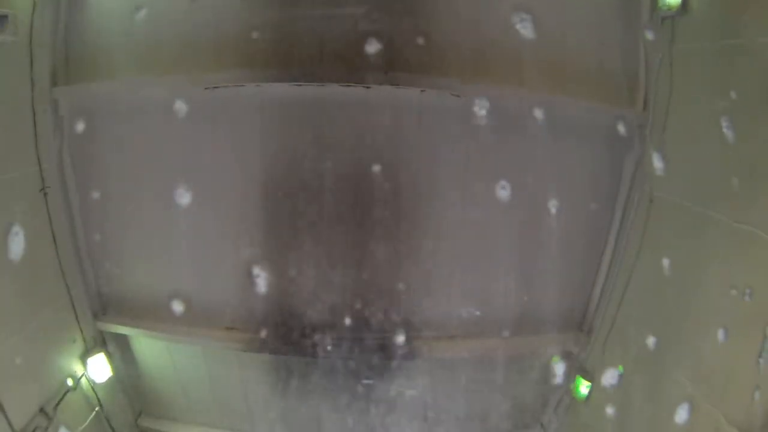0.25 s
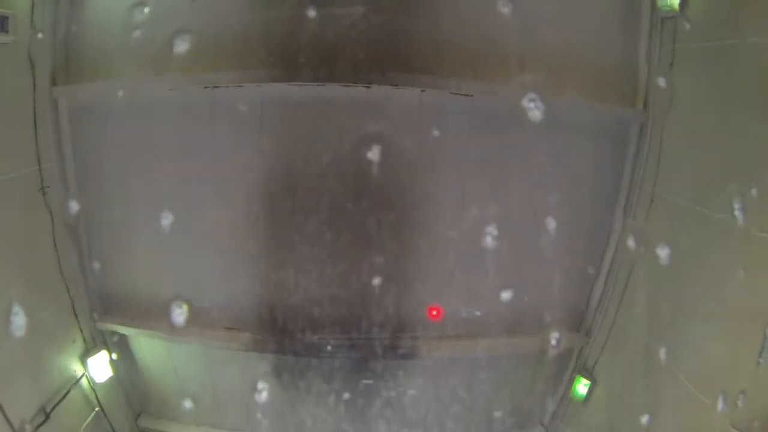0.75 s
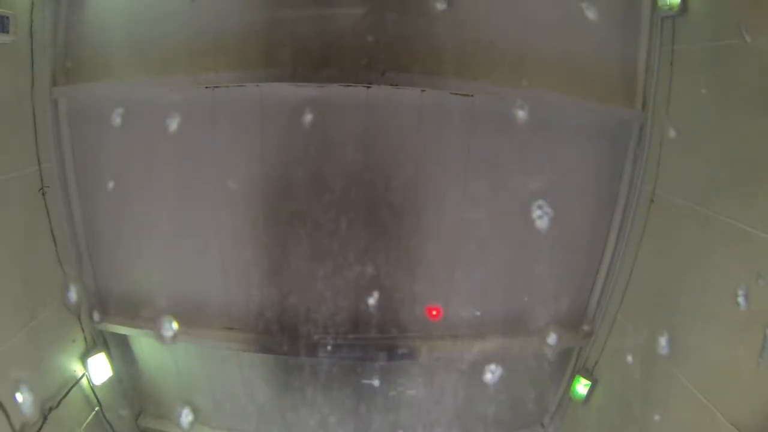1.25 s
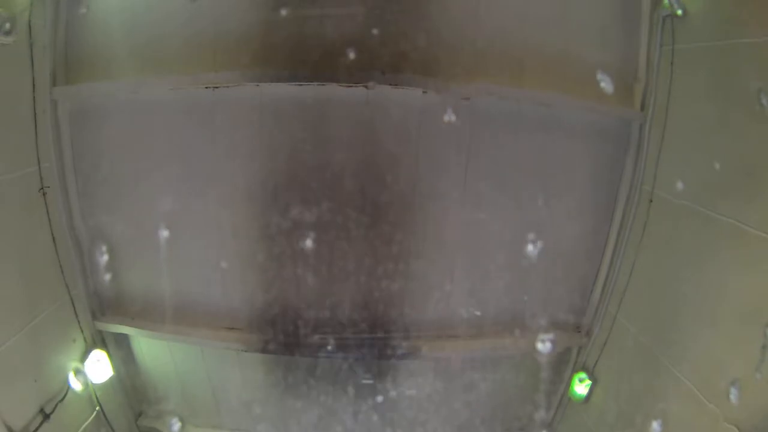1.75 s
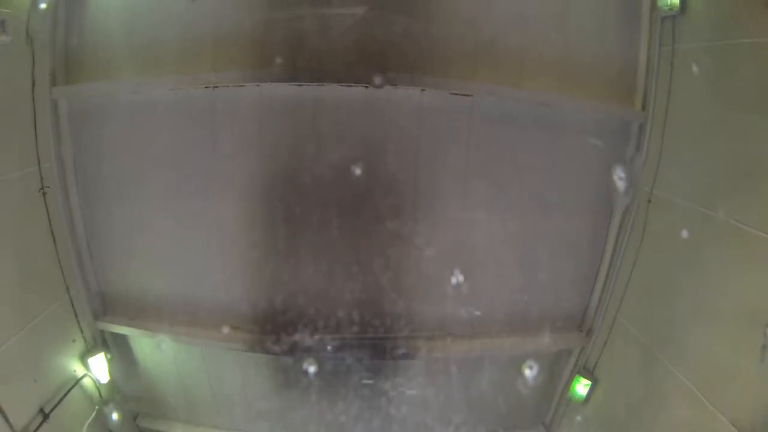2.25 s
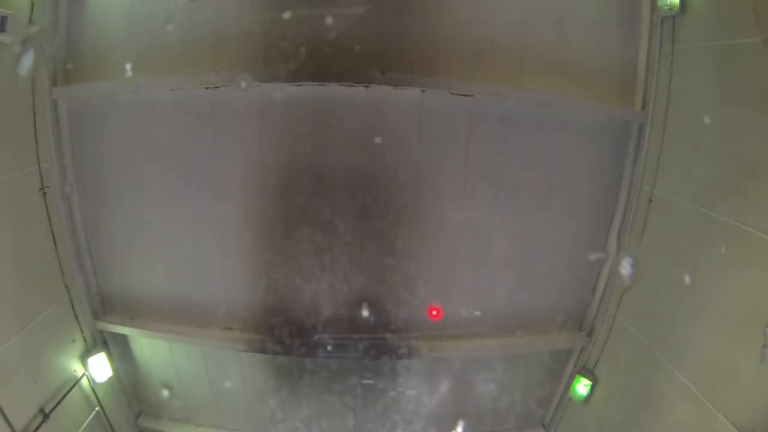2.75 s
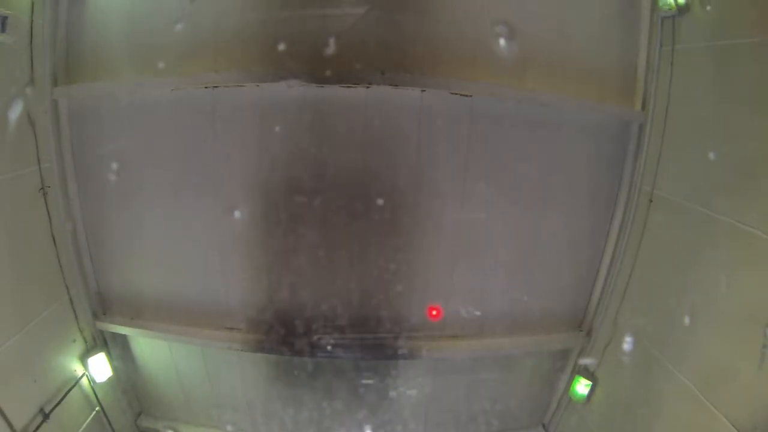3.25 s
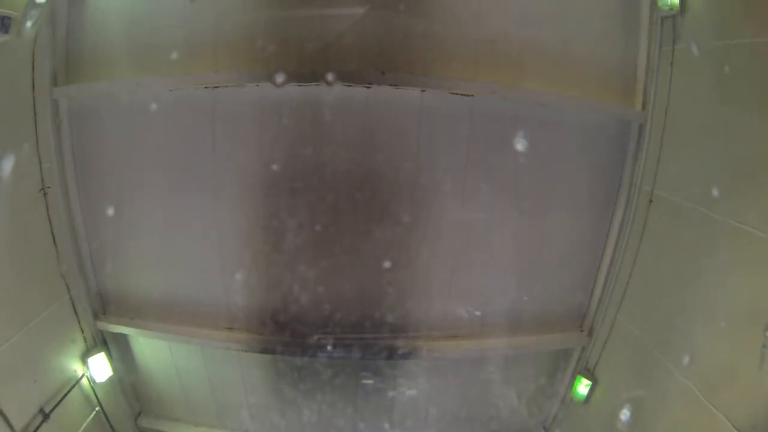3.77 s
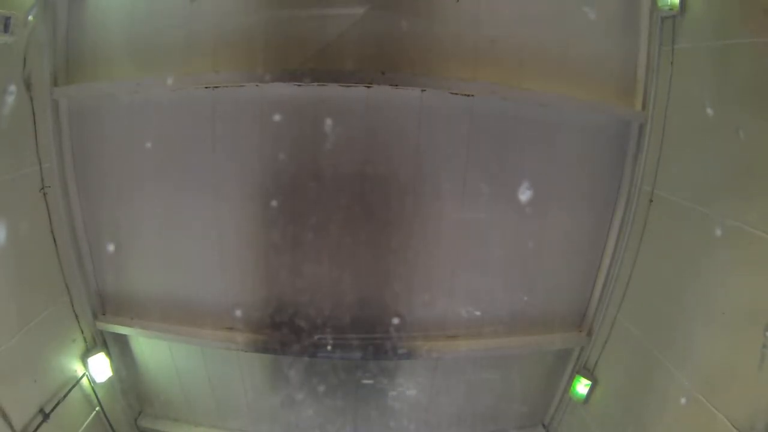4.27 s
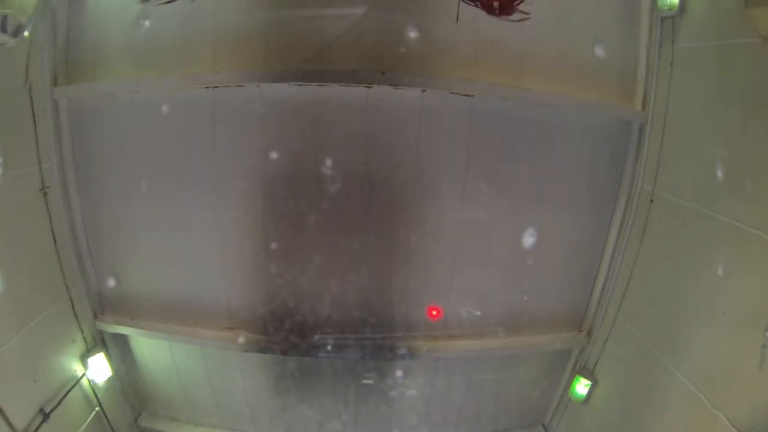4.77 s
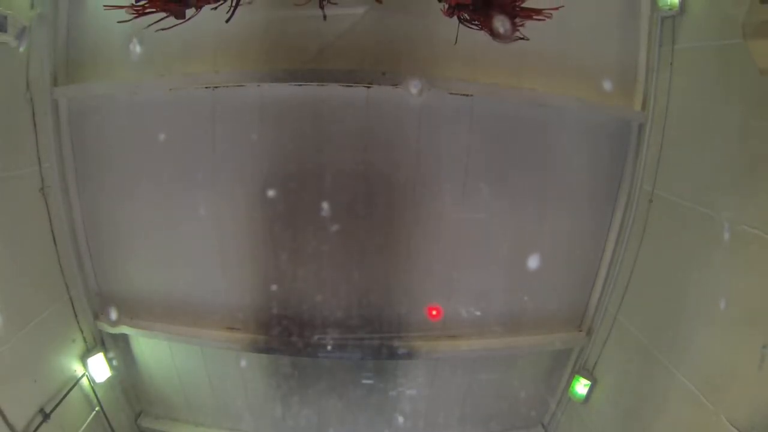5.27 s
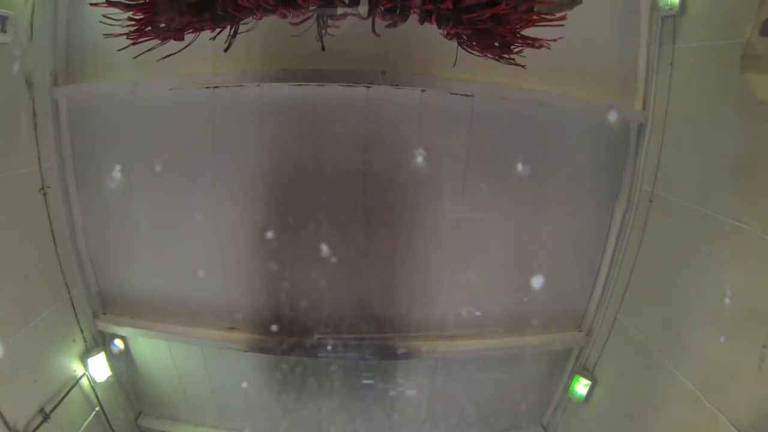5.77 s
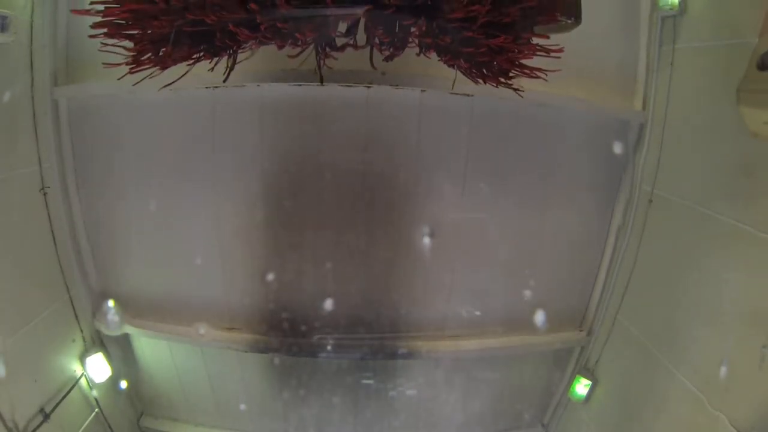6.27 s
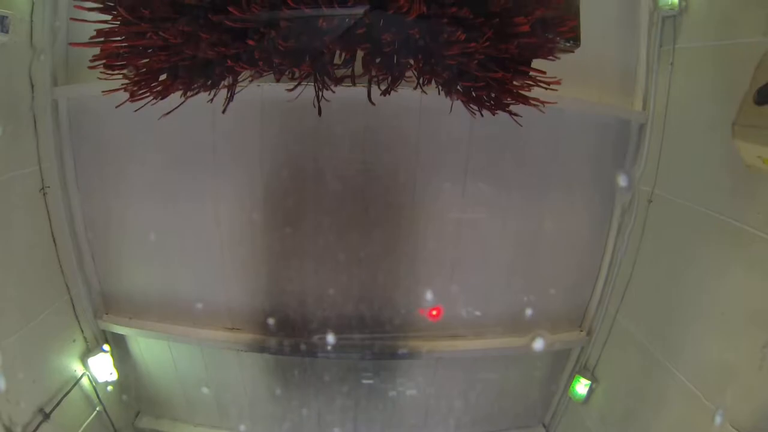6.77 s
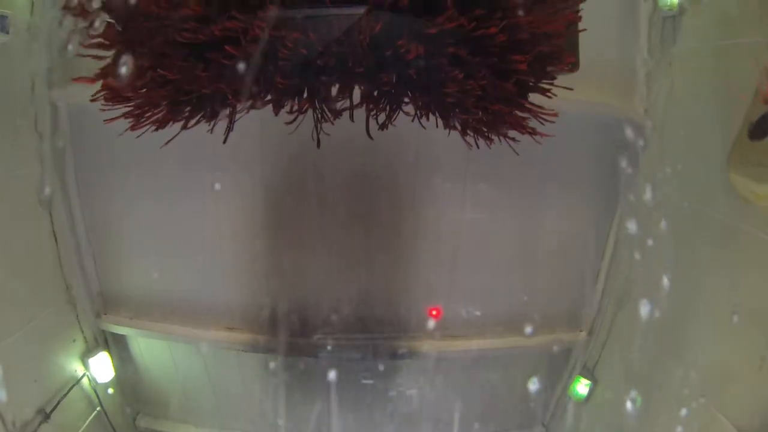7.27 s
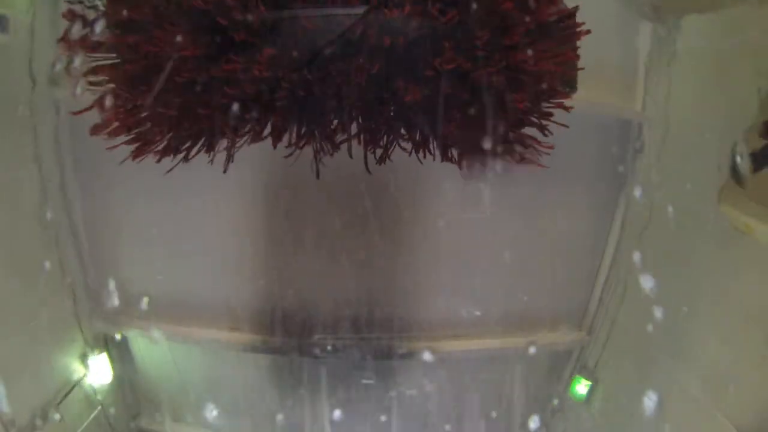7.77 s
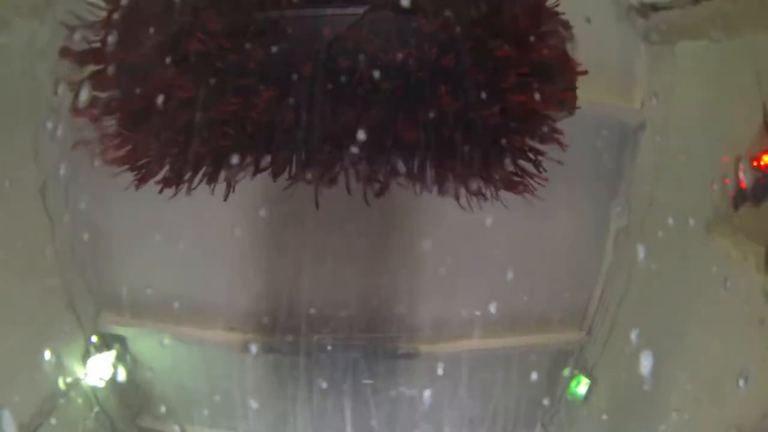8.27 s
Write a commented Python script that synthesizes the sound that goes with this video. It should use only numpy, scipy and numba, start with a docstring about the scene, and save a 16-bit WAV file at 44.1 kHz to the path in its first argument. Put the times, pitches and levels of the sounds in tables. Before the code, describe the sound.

Inside a closed car in a wash bay, muffled water rush and low motor hum run throughout. After faint early brushing, wet cloth strips begin slapping the shell in rhythmic bursts, with soft panel thuds, spray ticking on glass and deep cabin boom. The sweeps grow heavier and longer towards the end.

```python
"""Car wash from the cabin

Inside a closed car in an automatic wash: a spinning cloth brush comes closer and beats the shell in sweeps.
Close by, random slaps of wet strips ring the shell, fine spray ticks on the glass and wet cloth groans.
Soft thuds of the cloth's weight drum the panels; the shaken body makes the cabin air boom.
Beyond the glass, filtered noise gives wash and nozzle hiss, and wavering sines give the motors.
The recorder cuts the top of the treble."""
import sys
import numpy as np
from scipy import signal
from scipy.fft import rfft, irfft
from scipy.io import wavfile
from scipy.ndimage import uniform_filter1d
from numba import njit

SR = 44100
rng = np.random.default_rng(int(sys.argv[2]) if len(sys.argv) > 2 else 0)


def output_pcm(signal):
    """Save a mono or channel-first signal as 16-bit PCM at the path in sys.argv[1].

    Samples are clipped to [-1, 1] before scaling.
    """
    pcm = np.clip(np.atleast_2d(signal).T, -1, 1) * 32767
    wavfile.write(sys.argv[1], SR, np.round(pcm).astype(np.int16))


N = 375732
T = np.arange(N) / SR  # time in s


def undb(db):
    """Decibels to gain."""
    return 10 ** (np.asarray(db) / 20)


def to_db(gain):
    """Gain to decibels."""
    return 20 * np.log10(gain)


def unit(x):
    """Scale to standard deviation 1."""
    return x / np.std(x)


def smooth(x, k):
    """Running mean over k samples, twice."""
    return uniform_filter1d(uniform_filter1d(x, k), k)


def walk(rate):
    """Smooth random wandering of spread 1, with rate new values a second."""
    k = int(SR / rate)
    steps = np.repeat(rng.standard_normal(N // k + 1), k)
    return unit(smooth(steps, k)[:N])


def cut(x, hz, kind, order=2):
    """Low-pass or high-pass."""
    return signal.sosfilt(signal.butter(order, hz, kind, fs=SR, output="sos"), x)


def ring(x, modes):
    """Damped resonances side by side; neighbours swing in opposite sense."""
    out = 0
    for k, (hz, width_hz, db) in enumerate(modes):
        resonance = signal.lfilter(*signal.iirpeak(hz, hz / width_hz, SR), x)
        out = out + (-1) ** k * undb(db) * resonance
    return out


def colour(x, points, size=4096):
    """Causal minimum-phase filter with the given spectrum, made by folding its cepstrum."""
    hz, db = np.transpose(points)
    bins_hz = np.maximum(np.arange(size // 2 + 1) * SR / size, 1)
    spectrum_db = np.interp(np.log(bins_hz), np.log(hz), db)
    cepstrum = irfft(np.log(undb(spectrum_db)))
    cepstrum[1:size // 2] *= 2
    cepstrum[size // 2 + 1:] = 0
    response = irfft(np.exp(rfft(cepstrum)))
    return signal.fftconvolve(x, response)[:N]


@njit
def soften(x, hz):
    """Two-pole low-pass whose corner moves."""
    y, band, low = np.empty(len(x)), 0., 0.
    for i in range(len(x)):
        g = np.tan(np.pi * hz[i] / SR)
        v = (band + g * (x[i] - low)) / (1 + g * (g + 1.3))
        y[i] = low + g * v
        band, low = 2 * v - band, 2 * y[i] - low
    return y


def impacts(rate, spread_db):
    """Blows at random moments, rate a second, of either sign; spread_db makes their force uneven."""
    force = undb(spread_db * np.clip(rng.standard_normal(N), -2, 2))
    return (rng.random(N) < rate / SR) * force * rng.choice([-1, 1], N)


def play(x, db, span_s):
    """Bring a signal to the level db, keeping the unevenness that is faster than span_s."""
    power = smooth(x ** 2, int(span_s * SR))
    return undb(db) * x / np.sqrt(power + np.var(x) / 100)


def interior(x, t60, wet_db, count=6):
    """Short reflections inside the cabin: decaying noise tails whose mix wanders."""
    t = T[:SR // 5]
    tails = rng.standard_normal((count, len(t))) * np.exp(-np.log(1000) * t / t60)
    shares = np.array([walk(rate=14) for _ in tails])
    shares /= np.linalg.norm(shares, axis=0)
    wet = 0
    for share, tail in zip(shares, tails):
        wet = wet + share * signal.oaconvolve(x, tail / np.linalg.norm(tail))[:N]
    return x + undb(wet_db) * wet


def swell(s, half_width_s):
    """A smooth rise and fall about the moment s, 1 at its top."""
    return np.exp(-((T - s) / half_width_s) ** 2)


# running water and machinery all round the bay, relative spectrum: pitch_hz, level_db [dB per Hz]
BAY_SPECTRUM = [(30, 6), (100, -14), (175, 0.5), (270, -10.5), (500, -15), (1000, -21), (1550, -19.5),
                (2200, -27), (2900, -21.5), (4400, -31), (6500, -34), (9000, -39.5), (11200, -39),
                (14500, -43.5)]
# narrow hiss bands of the nozzles: pitch_hz, width_hz, level_db [relative]
NOZZLE_BANDS = [(5070, 190, -1), (10230, 260, -3)]
# motor hum and thin drive whine: pitch_hz, level_db [rms, about which it wavers]
MOTOR_TONES = [(59.2, -57.5), (119, -62), (179, -63.5), (818, -82), (1567, -80), (9830, -104), (10428, -96),
               (12646, -94)]


def machinery():
    """Outside the glass: broad wash of water and gear noise, hissing nozzles and wavering motor tones."""
    rumble_free = cut(rng.standard_normal(N), 25, "high")
    wash = unit(colour(rumble_free, BAY_SPECTRUM)) * undb(-57 + 0.63 * walk(rate=2.9))
    hiss = unit(ring(rng.standard_normal(N), NOZZLE_BANDS)) * undb(-79)
    hum = 0
    for hz, db in MOTOR_TONES:
        phase = 2 * np.pi * np.cumsum(hz + 2.455 * walk(rate=20)) / SR
        level = np.sqrt(2) * undb(db + 2 * walk(rate=10))
        hum = hum + level * np.sin(phase)
    return wash + hiss + hum


# slow shaking of the whole car: start_s, level_db [boom, before the trim in boom()]
SLOW_SHAKING = [(0, -46.5), (1.1, -53.5), (2.0, -45.5), (2.55, -41.5), (4.05, -41), (4.35, -38), (6.0, -36),
                (6.35, -41), (7.6, -35), (8.5, -36)]
# heavy shoves that rock the body: middle_s, level_db [boom, before the trim in boom()]
HEAVY_SHOVES = [(1.56, -43.5), (2.21, -40.5), (2.67, -34.5), (2.86, -37.5), (3.04, -32), (3.32, -39),
                (3.46, -33), (3.7, -32.5), (4.53, -35), (5.86, -33), (6.53, -34), (7.24, -34),
                (7.81, -30.5), (8.11, -27)]


def rocking():
    """Level of the boom in dB: slow shaking, joined by straight lines, and a few heavy shoves."""
    shaking_db = np.interp(T, *np.transpose(SLOW_SHAKING))
    shoves = sum(undb(db) * swell(s, half_width_s=0.085) for s, db in HEAVY_SHOVES)
    return to_db(np.hypot(undb(shaking_db), shoves))


# air of the cabin and the body on its springs: pitch_hz, width_hz, level_db [relative]
CABIN_MODES = [(28.4, 11, -7.5), (41.6, 8.4, -4), (55.75, 6.5, 3.5)]


def boom(shake_db):
    """The shaken body pumps the air of the closed cabin, which rings at its low resonances."""
    air = cut(ring(impacts(rate=390, spread_db=2.5), CABIN_MODES), 60.4, "low", order=4)
    return play(cut(air, 24.0, "high"), shake_db - .4, span_s=0.081)


# the brush turns steadily; its first tuft comes round at FIRST_TUFT_S and once a turn after that
FIRST_TUFT_S, TURN_S = 1.35, 0.79
# the four tufts of a turn: delay_s [after the first], half_width_s, strength_db
TURN_TUFTS = [(0, 0.047, -5), (0.144, 0.037, 1.5), (0.275, .027, -4.5), (.402, 0.037, -1)]


def tufts(lag_s=0):
    """Gain of the tufts as they come round, turn after turn."""
    turns = np.arange(FIRST_TUFT_S, T[-1], TURN_S) + lag_s
    return sum(undb(db) * swell(first + delay, width) for first in turns for delay, width, db in TURN_TUFTS)


def contact(start, end, rise, fall):
    """Gain of one sweep: attack, hold at 1, release; slopes in dB per s."""
    return undb(-rise * np.maximum(start - T, 0) - fall * np.maximum(T - end, 0))


PATTER_FALL, WEIGHT_FALL = 324, 74  # dB per s after a sweep
WEIGHT_RISE_SHARE = 0.63  # the weight builds more slowly than the patter
SLACK_DB, APPROACH_DB_PER_S = -9, 10  # weight left between sweeps; its fade-in before the first sweep
ARCH_DB = 1.5  # the weight swells by this much towards the middle of a sweep
TUFT_WEIGHT_DB, WEIGHT_LAG_S = 2.5, 0.03  # extra weight per unit of tuft gain, landing after the tips
STIR_DB = -15.5  # patter that the weight alone stirs up
FLING_DB, FLING_SLOPE = -50, 0.27  # below this patter level the spray dies away faster (extra dB per dB)
# sweeps of cloth over the car, long and short, on the whole growing heavier: start_s, end_s, rise_db_per_s,
# tufts_db, loose_strips_db, weight_db, spray_db [relative to the patter];
# levels before swells and the players' trims
CLOTH_SWEEPS = [(1.42, 1.69, 150, -83, -77, -58.5, -19), (1.78, 1.873, 196, -82, -84, -52.5, -18),
                (2.102, 2.31, 109, -80, -63.5, -49.5, -15), (2.44, 2.67, 352, -76.5, -68.5, -44, -23),
                (2.859, 3.123, 163, -45.5, -57.5, -43.5, -13), (3.172, 3.475, 449, -39, -61, -43, -12.5),
                (3.675, 4.02, 185, -38, -48.5, -41.5, -14), (4.068, 4.18, 400, -37.5, -49.5, -39, -12.5),
                (4.484, 4.953, 400, -39, -46.5, -43.5, -14), (5.302, 5.726, 451.5, -40, -43.5, -42.5, -14),
                (6.081, 6.176, 350, -43, -42.5, -44, -13), (6.2, 6.527, 201.5, -42, -39, -41, -13),
                (6.754, 6.845, 550, -43, -45.5, -44.5, -12), (6.886, 7.106, 121, -46, -39, -38.5, -11),
                (7.173, 7.439, 98, -42.5, -39, -38, -10.5), (7.6, 8.243, 143, -50.5, -39, -36.5, -11.5),
                (8.395, 8.6, 140, -38, -38, -35, -13)]


def turning():
    """Each sweep drags loose strips and tufts over the car; gives the levels of patter, spray and weight in dB."""
    tufted, patter = tufts(), 0
    starts, *_, weights_db, sprays_db = np.transpose(CLOTH_SWEEPS)
    approach_db = -APPROACH_DB_PER_S * np.maximum(starts[0] - T, 0)
    weight = undb(np.interp(T, starts, weights_db) + SLACK_DB + approach_db)
    for start, end, rise, tuft_db, loose_db, weight_db, _ in CLOTH_SWEEPS:
        slapping = np.hypot(undb(tuft_db) * tufted, undb(loose_db))
        patter = np.maximum(patter, contact(start, end, rise, PATTER_FALL) * slapping)
        arch = np.sin(np.pi * np.clip((T - start) / (end - start), 0, 1))
        pressing = contact(start, end, rise * WEIGHT_RISE_SHARE, WEIGHT_FALL)
        weight = np.maximum(weight, pressing * undb(weight_db + ARCH_DB * arch))
    press_db = to_db(weight) + TUFT_WEIGHT_DB * tufts(WEIGHT_LAG_S)
    patter_db = to_db(np.hypot(patter, undb(press_db + STIR_DB)))
    fling_db = FLING_SLOPE * np.minimum(patter_db - FLING_DB, 0)
    spray_db = patter_db + np.interp(T, starts, sprays_db) + fling_db
    return patter_db, spray_db, press_db


# fine spray heard through the glass, relative spectrum: pitch_hz, level_db [dB per Hz]
SPRAY_SPECTRUM = [(900, 4), (2200, -4), (3150, -7), (3750, 1.5), (4350, -14), (4900, -9), (6000, -19.5),
                  (6700, -17.5), (8000, -21), (9200, -30), (11000, -33.5), (12500, -43), (14500, -40)]


def spray(spray_db):
    """Drops flung off the cloth tick against the glass, in spurts."""
    drops = cut(colour(impacts(rate=3000, spread_db=0.5), SPRAY_SPECTRUM), 810, "high")
    spurts_db = spray_db + 3.5 + 2.0 * walk(rate=42)
    return play(interior(drops, t60=0.076, wet_db=-5.0), spurts_db, span_s=0.01)


def mist():
    """A tuft that stands out above the loose strips throws a short bright puff of fine drops."""
    starts, _, _, tufts_db, loose_db, *_ = np.transpose(CLOTH_SWEEPS)
    standing_out = 1 / (1 + undb(loose_db - tufts_db))
    level = np.interp(T, starts, undb(tufts_db - 22.5) * standing_out)
    puffs = tufts(lag_s=-0.015) ** 2  # the mist flies ahead of the tips
    drops = colour(impacts(rate=5000, spread_db=3), SPRAY_SPECTRUM)
    return level * puffs * unit(cut(drops, 5200, "high", order=4))


# sheet-metal panels under a soft blow, relative spectrum: pitch_hz, level_db [dB per Hz]
PANEL_SPECTRUM = [(62, -16.5), (82, 8.5), (102, -7), (134, 3.5), (162, -3.5), (200, 0.5), (250, -6.5),
                  (350, -7), (420, -14.5), (480, -11.5), (570, -23.5), (740, -6.5), (1000, -19.5)]


def drumming(press_db):
    """The bulk of the wet cloth thuds on the panels; a harder push shortens each contact and opens the sound."""
    crest_db = np.clip(press_db - uniform_filter1d(press_db, int(.8 * SR)), -10, 3)
    corner_hz = np.clip(380 * 2 ** ((press_db + 45) / 28 + crest_db / 14), 120, 700)
    thuds = colour(impacts(rate=400, spread_db=0.0), PANEL_SPECTRUM)
    return play(soften(soften(thuds, corner_hz), corner_hz), press_db, span_s=0.22)


# cloth dragging over the paint: middle_s, length_s, pitch_hz [top, before waver],
# level_db [before grip and the levelling in scene()]
CLOTH_DRAGS = [(1.85, 0.12, 355.5, -51.5), (2.49, 0.15, 143.8, -31.5), (2.635, 0.21, 236.4, -49),
               (3.362, .1, 395, -45), (4.19, .1, 197.5, -36.5), (4.7, .08, 315.6, -38.5),
               (8.235, 0.21, 208.8, -34), (8.449, 0.07, 218, -26)]


def drags():
    """Wet cloth sticks and slips: a rough groan that rises as it is pulled taut and sinks as it lets go."""
    out = np.zeros(N)
    waver, grip = 0.052 * walk(rate=110), undb(1.6 * walk(rate=70))
    for s, length, hz, db in CLOTH_DRAGS:
        on = np.abs(T - s) < length / 2
        taut = np.cos(np.pi * (T[on] - s) / length)
        pitch_hz = hz * (1 - 0.3 * (1 - taut) + waver[on])
        groan = np.sin(2 * np.pi * np.cumsum(pitch_hz) / SR)
        out[on] += undb(db) * taut * grip[on] * groan
    return out


# ring of the struck shell: pitch_hz, width_hz, level_db [relative]
SHELL_MODES = [(470, 265, -12.5), (792, 64, -11.5), (1252, 128, -3), (1383, 90, -3), (1398, 34, 2),
               (1571, 89, 2), (1784, 54, -6), (2039, 123, -10.5), (2852, 56, -13.5), (3650, 300, -19)]


def shell(blows):
    """Roof and glass answer a slap with their damped resonances."""
    return cut(cut(ring(blows, SHELL_MODES), 320, "high"), 3630, "low")


# single hard slaps of a strip: start_s, level_db [4 dB above the peak played]
HARD_SLAPS = [(2.91, -34), (3.066, -28), (4.0898, -23), (4.144, -18), (4.9938, -33.5), (5.266, -49),
              (5.289, -28.5), (6.739, -37), (7.507, -36), (8.315, -32), (8.422, -32)]


def whips():
    """Now and then one strip lands flat and hard and rings the shell."""
    slap = shell(signal.unit_impulse(N))[:SR // 10]
    slap = slap / np.abs(slap).max()
    out = np.zeros(N)
    for s, db in HARD_SLAPS:
        rest = out[int(s * SR):][:len(slap)]
        rest += undb(db - 4) * slap[:len(rest)]
    return out


def strips(patter_db):
    """Cloth tips slap the shell, more of them the louder the patter, their force wandering."""
    rate = 800 + 900 * undb((patter_db - patter_db.max()) / 2)
    slaps = impacts(rate, spread_db=2.5) * undb(0.74 * walk(rate=60))
    return play(interior(shell(slaps), t60=0.15, wet_db=-5.5), patter_db + 0.52, span_s=0.066)


def scene():
    """The brush reaches the car over the running machinery."""
    patter_db, spray_db, press_db = turning()
    brush = strips(patter_db) + whips() + spray(spray_db) + mist()
    # thuds and groans share the force with which the brush bears on the car
    bearing = (drumming(press_db) + drags()) / undb(press_db)
    body = play(bearing, press_db + 1.1, span_s=0.056)
    return (brush + body + boom(rocking()) + machinery())[None]


def record(dry):
    """The recorder cuts the top with a steep low-pass at 14.9 kHz."""
    return signal.sosfilt(signal.ellip(10, .2, 80, 14900, fs=SR, output="sos"), dry)


dry = scene()
out = record(dry)
output_pcm(out)
```